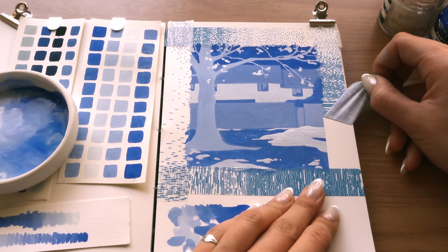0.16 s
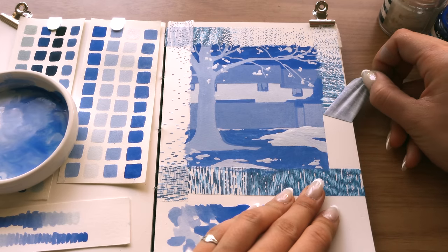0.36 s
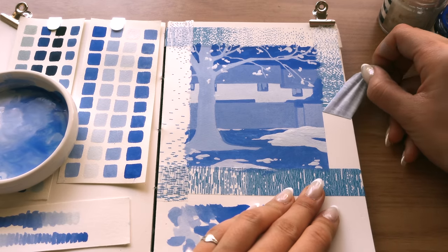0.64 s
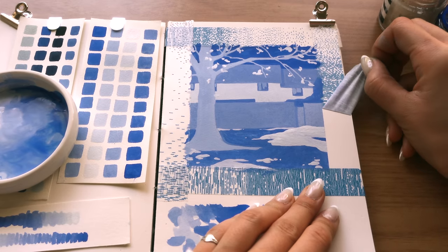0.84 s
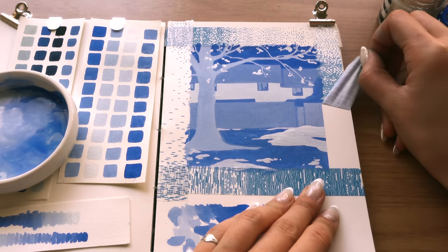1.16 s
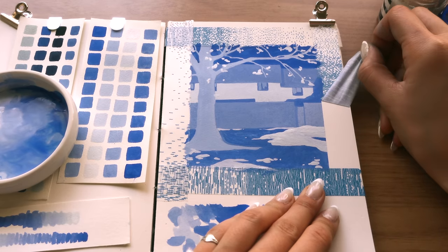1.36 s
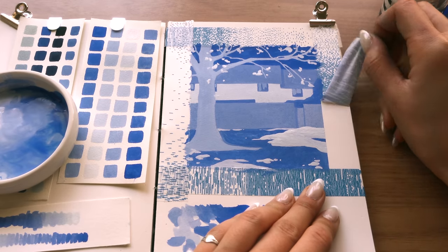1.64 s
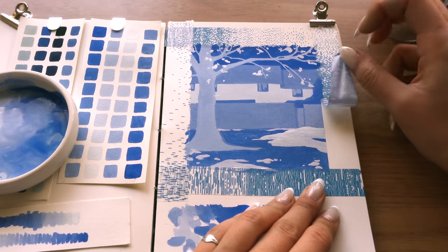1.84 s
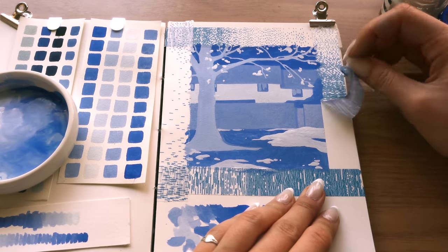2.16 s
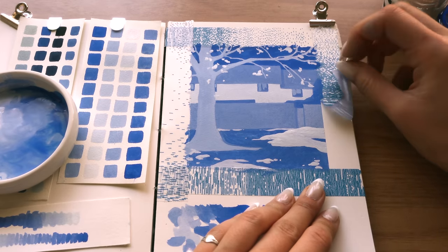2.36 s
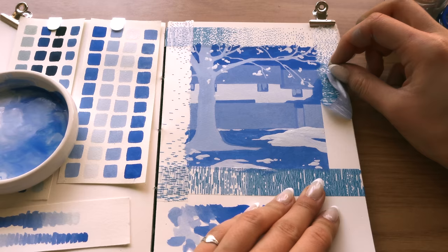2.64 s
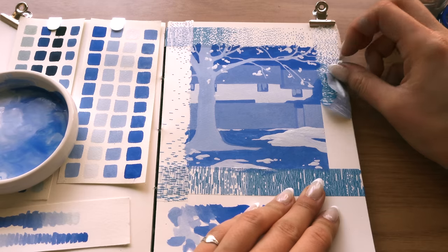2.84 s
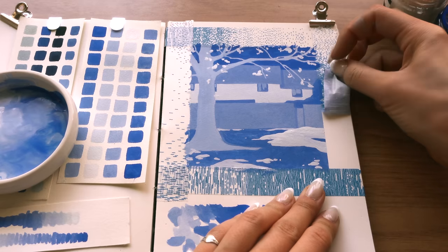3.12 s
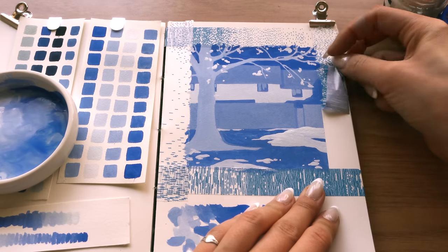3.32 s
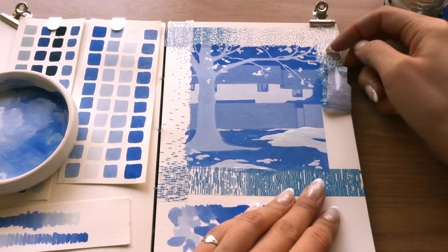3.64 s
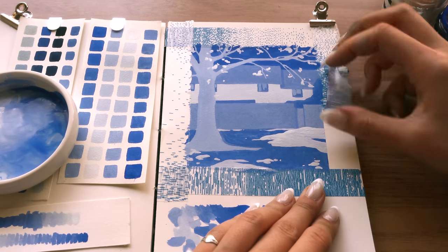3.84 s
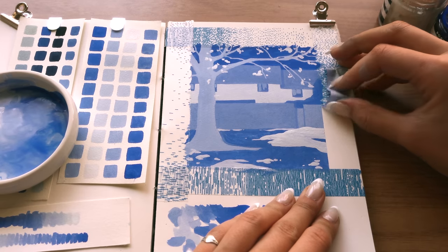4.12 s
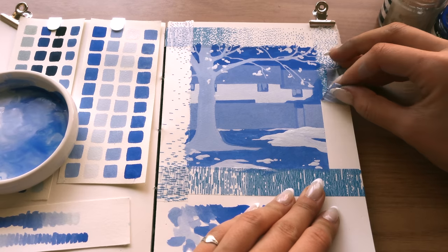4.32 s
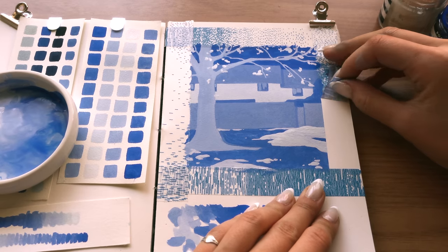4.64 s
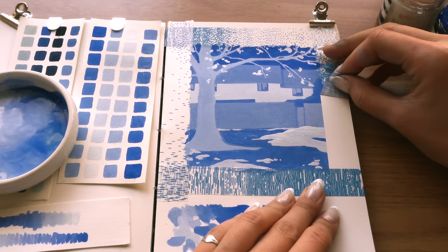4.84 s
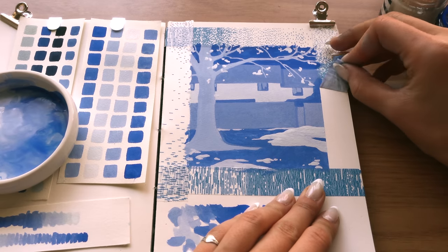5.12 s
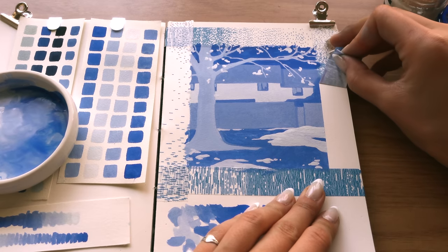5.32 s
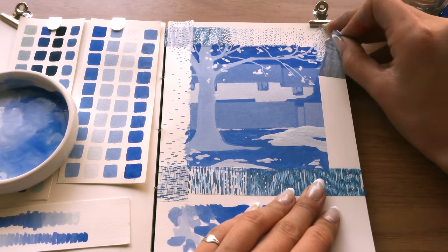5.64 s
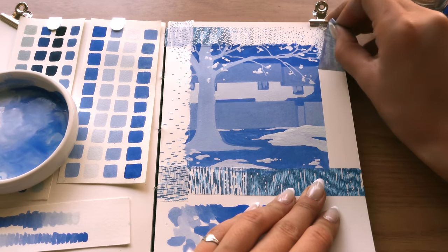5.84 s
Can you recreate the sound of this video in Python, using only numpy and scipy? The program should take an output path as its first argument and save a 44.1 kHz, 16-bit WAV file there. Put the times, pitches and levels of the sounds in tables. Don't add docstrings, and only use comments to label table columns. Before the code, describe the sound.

Close, dry sound of adhesive tape lifting from a page: soft fizzing grains, bright clicks, low desk bumps, then a longer tearing pull.

```python
import sys
import numpy as np
from scipy import signal
from scipy.fft import rfft, irfft, next_fast_len
from scipy.io import wavfile
from scipy.ndimage import map_coordinates

SR = 44100
rng = np.random.default_rng(int(sys.argv[2]) if len(sys.argv) > 2 else 0)


def generate_wav(signal):
    frames = np.transpose(np.atleast_2d(signal))
    scaled = np.clip(frames, -1, 1) * 32767
    pcm = np.round(scaled).astype(np.int16)
    wavfile.write(sys.argv[1], SR, pcm)


def volts_from_db(level):
    exponent = np.asarray(level, float) / 20
    return 10 ** exponent


N = 263718


def unit(x):
    return x / np.sqrt(np.mean(x ** 2) + 1e-20)


def noise():
    return rng.standard_normal(N)


def along(points, hz):
    point_hz, values = np.transpose(points)
    return np.interp(np.log(hz + 1), np.log(point_hz + 1), values)


def curves(rows):
    knots_s, *columns = np.transpose(rows)
    t_s = np.arange(N) / SR
    return [np.interp(t_s, knots_s, column) for column in columns]


def wobble(rate_hz):
    knots = rng.standard_normal(int(N * 400 / SR) + 4)
    return map_coordinates(knots, [np.arange(N) * rate_hz / SR])


def filtered(x, response):
    size = next_fast_len(N + SR // 2)
    hz = np.fft.rfftfreq(size, 1 / SR)
    return irfft(rfft(x, size) * response(hz), size)[..., :N]


def coloured(x, spectrum):
    return unit(filtered(x, lambda hz: volts_from_db(along(spectrum, hz))))


def peak(hz, centre_hz, width_hz):
    damping = 1j * hz * width_hz
    return damping / (centre_hz ** 2 - hz ** 2 + damping)


def hiss():
    # frequency in Hz, density in dB per Hz.
    hiss_spectrum = [(20, -17), (300, -6.5), (700, 9.5), (1200, -31), (3000, -21), (8000, -9), (16000, -25),
                     (20000, -30)]
    return volts_from_db(-59) * coloured(noise(), hiss_spectrum)


def room(x):
    # frequency in Hz, decay time t60 in seconds.
    decay_times = [(200, 0.34), (1500, .25), (6000, 0.27), (14000, 0.2)]
    hz, t_s, cells = signal.stft(rng.standard_normal(SR // 2), SR, nperseg=256)
    decay = volts_from_db(-60 * t_s / along(decay_times, hz)[:, None])
    tail = signal.istft(cells * decay, SR, nperseg=256)[1]
    delayed = np.pad(x, (90, 0))
    return signal.fftconvolve(delayed, tail / np.linalg.norm(tail))[:N]


def flutter(x):
    # delay in seconds, level in dB.
    echoes = [
        (.0096, -26),
        (0.02, -32),
        (.0289, -39),
    ]

    def bounces(hz):
        echo_sum = sum(volts_from_db(db) * np.exp(-2j * np.pi * hz * delay_s) for delay_s, db in echoes)
        return echo_sum * peak(hz, 8500, 7000)

    return filtered(x, bounces)


def desk():
    # time in seconds, rumble level in dB, thud level in dB.
    desk_levels = [(0.0, -42, -46.5), (0.077, -45.5, -53.5), (0.375, -48.5, -55.5), (0.585, -45, -58.5),
                   (0.705, -46, -53.5), (0.749, -36.5, -53), (1.205, -49, -53.5), (1.377, -44.5, -49.5),
                   (1.68, -50.5, -52), (1.816, -37.5, -58), (1.86, -48, -52), (1.979, -43, -57),
                   (2.113, -49, -55.5), (2.176, -42.5, -53), (2.453, -50.5, -55), (2.793, -41, -51),
                   (3.003, -48, -53.5), (3.244, -43.5, -49), (3.375, -45, -54.5), (3.66, -48.5, -51.5),
                   (3.729, -46.5, -56.5), (3.934, -39, -52), (3.981, -48, -50.5), (4.153, -49, -57),
                   (4.207, -44, -53), (4.287, -38, -42.5), (4.402, -52, -58), (4.759, -49.5, -52.5),
                   (4.987, -50, -55), (5.144, -44, -49), (5.24, -49.5, -50.5), (5.471, -48.5, -51.5),
                   (5.571, -47, -49), (5.692, -44, -38.5), (5.843, -45, -50), (5.979, -38, -45)]
    # frequency in Hz, density in dB per Hz.
    rumble_spectrum = [(12, -8), (25, -1.5), (50, 1.5), (100, -2.5), (130, -7.5), (200, -58)]
    thud_spectrum = [(80, -25), (125, -1.5), (200, 0.5), (320, -3), (420, -10.5), (700, -30)]
    rumble_db, thud_db = curves(desk_levels)
    rumble = unit(volts_from_db(1.7 * wobble(12)) * coloured(noise(), rumble_spectrum))
    thuds = unit(volts_from_db(1.7 * wobble(14)) * coloured(noise(), thud_spectrum))
    return volts_from_db(rumble_db) * rumble + volts_from_db(thud_db) * thuds


def taut():
    # time in seconds, level in dB.
    taut_levels = [
        (5.1, -75),
        (5.16, -42),
        (5.27, -62),
        (5.34, -45.5),
        (5.45, -40.5),
        (5.53, -42.5),
        (5.6, -72),
    ]
    hum = filtered(noise(), lambda hz: peak(hz, 1472, 290) ** 2)
    level_db = curves(taut_levels)[0] + 2.7 * wobble(40)
    return volts_from_db(level_db) * unit(hum)


def snaps():
    # time in seconds, peak in dB, pitch in Hz,
    # then page knock, flap knock and bright crack in dB against the peak.
    snap_events = [(0.2173, -25, 3680, -20, -5, -21), (0.2841, -31, 5400, -34, -23, -11),
                   (0.3201, -33, 3140, -9, -12, -16), (0.5963, -41.5, 1600, -20, -9, -21),
                   (0.7265, -30, 3800, -12, -13, -17), (0.8962, -33.5, 3500, -10, -17, -24),
                   (1.0004, -29, 2900, -7, -13, -12), (1.0068, -26, 4300, -26, -18, -13),
                   (1.4385, -29.5, 3400, -24, -14, -13), (1.6176, -38.5, 2500, -21, -16, -10),
                   (1.661, -34, 3200, -31, -15, -12), (1.6703, -34, 1500, 5.5, 6, -1),
                   (1.7053, -25, 9700, -24, -16, -14), (1.7212, -33, 2000, -32, -13, -14),
                   (1.7249, -30, 3100, -22, -20, -13), (1.7309, -26.5, 3100, -31, -14, -8),
                   (1.759, -28, 5600, -27, -21, -12), (1.775, -19, 6800, -33, -14, -13),
                   (1.7818, -24, 10200, -29, -30, -6), (1.7881, -23, 10000, -34, -20, -1),
                   (1.7906, -11, 3330, -16, -36, -10), (2.052, -28, 3280, -8, -13, -19),
                   (2.1227, -29, 12600, -35, -27, -14), (2.1334, -12.5, 6700, -40, -18, -16),
                   (2.1362, -33, 7100, -23, -23, -16), (2.1427, -18, 6100, -36, -24, -19),
                   (2.1471, -26, 1830, -24, -1, -18), (2.166, -18.5, 11500, -39, -25, -15),
                   (2.2779, -35, 6130, -20, -29, -16), (2.3193, -22, 10200, -40, -11, -18),
                   (2.3238, -28, 6400, -18, -8, -17), (2.326, -31, 3350, -28, -15, -21),
                   (2.4104, -15, 5900, -28, -12.5, -33), (2.476, -7.5, 5770, -37, -31, -37),
                   (2.5696, -26, 6000, -17, -6, -25), (2.6054, -36, 5100, -14, -20, -20),
                   (2.622, -16, 6100, -22.5, -27, -30), (2.6567, -24, 2040, -17, 5, -8.5),
                   (2.6594, -33, 2200, -12, -11, -11), (2.687, -24, 5900, -30, -31, -13),
                   (2.7345, -27, 1880, -17, -5, -19), (2.7573, -23, 1190, -15, 4, -31),
                   (2.78, -27, 5300, -23, -18, -25), (2.9883, -28, 5470, -12, -17, -18),
                   (2.9962, -36, 1210, -10, -10, -27), (3.0333, -25, 5300, -30, -19, -18),
                   (3.0826, -33, 1810, -23, -18, -21), (3.0923, -20.5, 7100, -26, -20, -20),
                   (3.1091, -30, 7000, -29, -24, -12), (3.1853, -31, 1800, -25, -22, -19),
                   (3.2101, -11.5, 7400, -24, -25, -18), (3.2132, -12, 4480, -12, -6, -29),
                   (3.2246, -18, 6600, -27, -20, -14), (3.241, -16, 10100, -31, -26, -17),
                   (3.2612, -26, 10400, -19, -24, -15), (3.2706, -22, 6900, -25, -8, -17),
                   (3.2825, -23, 6500, -31, -23, -15), (3.2913, -19.5, 6760, -36, -23, -18),
                   (3.4176, -13.5, 6600, -35, -15, -33), (3.4386, -30.5, 1170, -7, -16, -12),
                   (3.466, -26, 5300, -4, -9, -17), (3.5321, -34, 5300, -29, -19, -27),
                   (3.5382, -31.5, 2800, -7, -9, -34), (3.5558, -30, 9900, -26, -26, -10),
                   (3.572, -2, 6440, -23.5, -10, -12), (3.5744, -16.5, 5600, -10.5, -16, -15),
                   (3.5925, -16, 5100, -32, -19, -22), (3.5953, -20, 6600, -35, -19, -24),
                   (3.5976, -21, 4900, -34, -10, -18), (3.601, -22, 5600, -26, -24, -26),
                   (3.6212, -2.5, 4970, -23, -28, -21), (3.6248, 1, 6700, -46, -13.5, -12.5),
                   (3.6265, -20, 5400, -11, -16, -23), (3.7822, -28, 2800, -23, -14, -7),
                   (3.786, -25, 7900, -9, -10, -14), (3.789, -20.5, 5330, -15, -23, -15.5),
                   (3.9481, -20.5, 3800, -11.5, -10, -8), (3.9503, -23, 3680, -13, -4, -17),
                   (3.958, -19.5, 2970, -1, -22, -9), (3.9658, -16, 6200, -32, -20, -16),
                   (4.1316, -24, 5900, -14, -17, -17), (4.187, -24, 10200, -27, -22, -13),
                   (4.191, -21, 9800, -33, -26, -18), (4.2095, -26, 8000, -33, -14, -12),
                   (4.2308, -13, 7800, -21, -13, -22), (4.2653, 7.5, 7200, -20, -12, -18),
                   (4.4243, -31, 4100, -11, -15, -21), (4.4304, -21.5, 7050, -28, -14, -24),
                   (4.468, -31, 6100, -28, -18, -19), (4.5766, -32, 6400, -20, -19, -24),
                   (4.6633, -26, 2300, -17, -9, -29), (4.6965, -21, 3600, -28, -15, -23),
                   (4.8025, -24, 3760, -11, -3, -22), (4.9154, -22, 10100, -34, -20, -12),
                   (4.9564, -28, 8800, -18, -21, -12), (4.9796, -32, 3700, -36, -17, -11),
                   (5.1067, -19, 4100, -30, -19, -12), (5.1668, -2.5, 3970, -45, -21, -12.5),
                   (5.216, -15, 10300, -25, -21, -15), (5.2186, -8, 5340, -29, -16, -13),
                   (5.2308, -8, 9500, -43, -20, -21), (5.241, -15, 1700, -7.5, 1, -22),
                   (5.2647, -11.5, 3900, -39, -21, -21), (5.3137, -25, 8000, -32, -30, -14),
                   (5.7933, -19, 3570, -28, -18, -16)]
    t_s = np.arange(SR // 50) / SR
    ticks = np.zeros(N + len(t_s))
    blows = np.zeros((3, N + len(t_s)))
    for start_s, peak_db, pitch_hz, *rel_db in snap_events:
        grit = rng.standard_normal(len(t_s))
        start = round(start_s * SR)
        at = slice(start, start + len(t_s))
        fade = volts_from_db(-60 * t_s * pitch_hz / 16)
        fade = fade * (1 - np.exp(-t_s / 0.0001))
        ticks[at] += volts_from_db(peak_db + 0.5) * fade * (np.sin(2 * np.pi * pitch_hz * t_s) + 0.12 * grit)
        blow = volts_from_db(-60 * t_s / 0.003) * grit
        blows[:, at] += volts_from_db(peak_db + np.array(rel_db))[:, None] * blow
    page = volts_from_db(17.5) * filtered(blows[0], lambda hz: peak(hz, 615, 1590) ** 2)
    flap = volts_from_db(9.5) * filtered(blows[1], lambda hz: peak(hz, 2830, 3260) ** 2)
    edge = volts_from_db(11.5) * filtered(blows[2], lambda hz: peak(hz, 9840, 9300) ** 2)
    return ticks[:N] + page + flap + edge


def peel():
    # time in seconds, page, flap, strip and fizz levels in dB.
    peel_levels = [(0.0, -54, -51, -60, -61), (0.222, -52, -50, -54, -55),
                   (0.356, -58, -54.5, -60.5, -60.5), (0.954, -49.5, -48, -51, -54),
                   (1.086, -51.5, -51, -55.5, -56.5), (1.344, -47.5, -48.5, -56, -54.5),
                   (1.508, -50.5, -50.5, -56, -53.5), (1.645, -57.5, -63, -68, -66),
                   (1.674, -48, -59, -57, -61), (1.748, -53, -55, -56, -53), (1.785, -53, -49, -34.5, -46),
                   (1.816, -53, -60, -52, -63), (1.901, -58, -64, -69, -67), (2.077, -62, -64, -60, -62),
                   (2.126, -57, -58, -56, -51), (2.144, -49, -52, -40, -52), (2.192, -59, -60, -63, -61),
                   (2.234, -62.5, -64, -67, -67), (2.309, -60, -64, -64, -61), (2.324, -56, -53, -44, -57),
                   (2.355, -60, -63, -72, -65), (2.46, -60, -66, -68, -66), (2.481, -54, -50, -48, -57),
                   (2.503, -63, -62, -62, -66), (2.538, -58, -53, -51.5, -58),
                   (2.604, -61.5, -68, -64, -69), (2.722, -51.5, -51, -41, -44.5),
                   (2.804, -57.5, -61, -62, -65), (2.89, -58.5, -62.5, -68, -65),
                   (3.022, -51, -50, -51, -51), (3.041, -52, -53, -46, -47), (3.094, -50.5, -51, -47, -49),
                   (3.122, -49, -49, -53, -53), (3.217, -42, -49, -45, -49), (3.257, -46.5, -53, -54, -56),
                   (3.354, -44.5, -48, -41, -47.5), (3.395, -59, -60, -55, -62),
                   (3.464, -51, -55, -47.5, -54), (3.514, -65, -66, -60, -60), (3.561, -53, -53, -47, -50),
                   (3.577, -40, -51, -38, -45), (3.609, -51, -47, -42, -52), (3.627, -34, -45, -37, -41),
                   (3.649, -55, -51, -49, -56), (3.734, -55, -56, -52.5, -63), (3.764, -50, -55, -54, -58),
                   (3.785, -41, -52, -44, -51), (3.808, -56, -51, -54, -60), (3.916, -57, -62, -59, -64),
                   (3.94, -51, -56, -58, -57), (3.957, -42, -46.5, -38.5, -40),
                   (4.016, -42, -41, -44.5, -40.5), (4.06, -49.5, -51, -52, -51),
                   (4.126, -49, -52, -46.5, -50), (4.158, -58, -55.5, -56, -58),
                   (4.271, -37, -43, -34, -38.5), (4.377, -53, -57.5, -45.5, -56),
                   (4.482, -58, -59.5, -54.5, -62), (4.516, -53, -52, -49.5, -56),
                   (4.571, -54, -52.5, -52, -60), (4.692, -47.5, -40.5, -43.5, -48.5),
                   (4.994, -55, -52, -57, -52), (5.17, -39.5, -37.5, -36, -40),
                   (5.296, -48, -45, -47.5, -47.5), (5.936, -37, -38.5, -40.5, -47.5),
                   (5.979, -35, -39, -38, -45)]
    # frequency in Hz, density in dB per Hz.
    page_spectrum = [(250, -12), (420, 1.5), (800, -1), (1450, -0.5), (2000, 0.5), (2500, -9), (4000, -34)]
    flap_spectrum = [(1500, -50), (2300, -6.5), (2900, -3), (3600, 0), (4200, -4.5), (4800, -7),
                     (7000, -27)]
    strip_spectrum = [(3200, -54), (4500, -5.5), (5600, 2.5), (6700, 0), (8200, -1), (9200, -7.5),
                      (12000, -48)]
    fizz_spectrum = [(6500, -53), (8800, -5), (10300, -1), (12000, -3), (14500, -4), (16500, -4.5),
                     (19000, -17)]
    spectra = (page_spectrum, flap_spectrum, strip_spectrum, fizz_spectrum)
    graininess = (0.28, 0.31, 0.67, 0.38)

    sizes = volts_from_db(5.75 * rng.exponential(size=N)) * noise()
    happens = rng.random(N) < 0.04
    breaks = unit(np.clip(sizes, -40, 40) * happens)
    clumps_db = 1.34 * wobble(40) + 1.44 * wobble(150)
    out = np.zeros(N)
    for level_db, spectrum, grainy in zip(curves(peel_levels), spectra, graininess):
        rub = noise()
        drive = volts_from_db(clumps_db + 0.33 * wobble(25)) * (grainy * breaks + rub)
        out += volts_from_db(level_db) * coloured(drive, spectrum)
    return out


def scene():
    hits = snaps()
    echoed = hits + flutter(hits) + volts_from_db(-15) * room(hits)
    mono = hiss() + desk() + taut() + echoed + peel()
    return np.array([mono, mono])


def roll_off(x):
    return signal.sosfilt(signal.butter(12, 16460, fs=SR, output="sos"), x)


def record(dry):
    x = filtered(dry, lambda hz: np.where(hz < 15800, 1, volts_from_db(-30)))
    side_tilt = [(200, 0), (3000, -3), (12000, -1.5)]  # Hz, dB
    side = volts_from_db(-27) * filtered(x[0] * noise(), lambda hz: volts_from_db(along(side_tilt, hz)))
    mix = np.clip(x + [side, -side], -1, 1)
    return roll_off(mix)


dry = scene()
out = record(dry)
generate_wav(out)
```